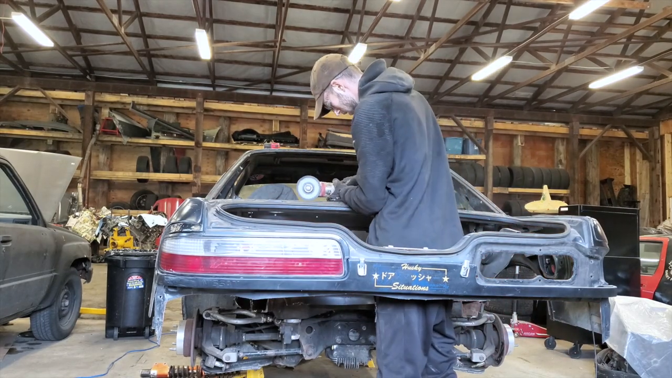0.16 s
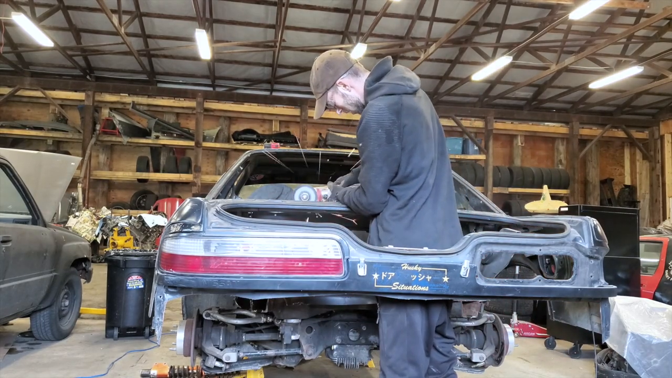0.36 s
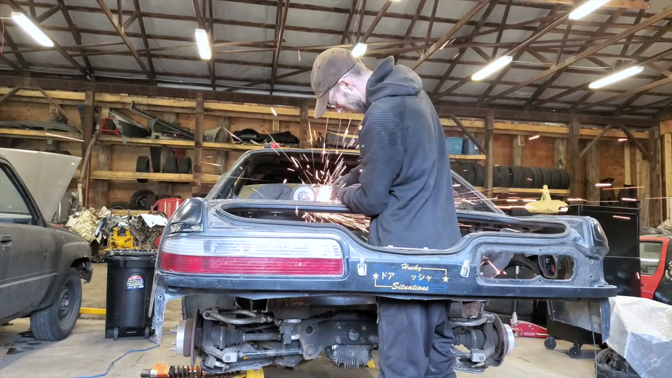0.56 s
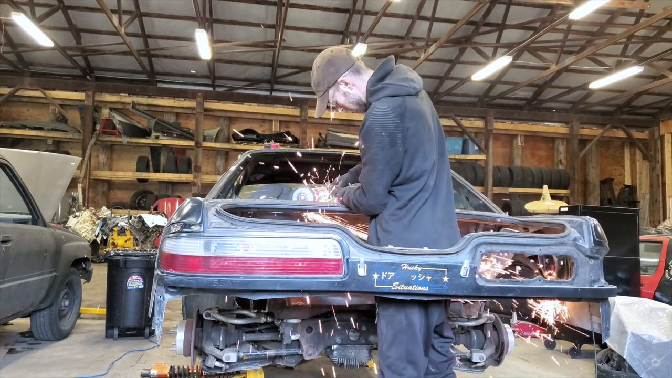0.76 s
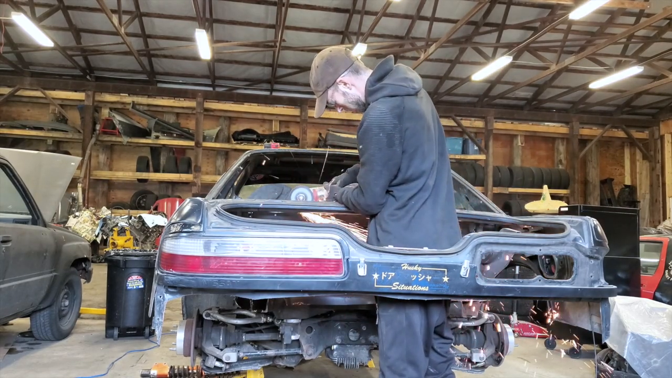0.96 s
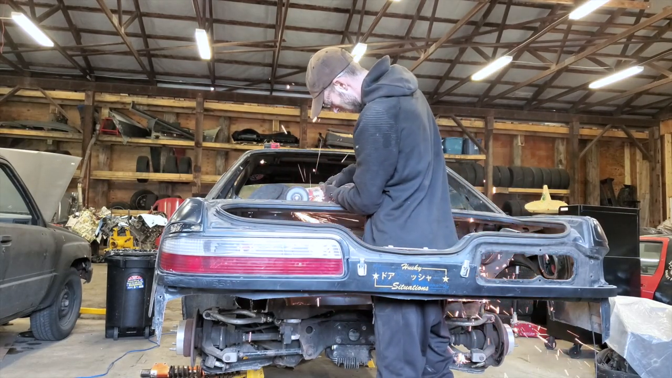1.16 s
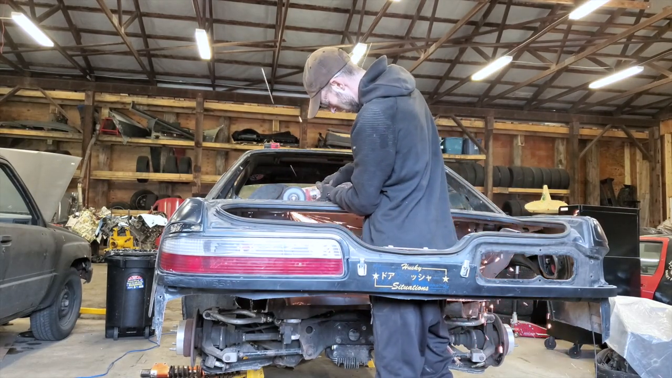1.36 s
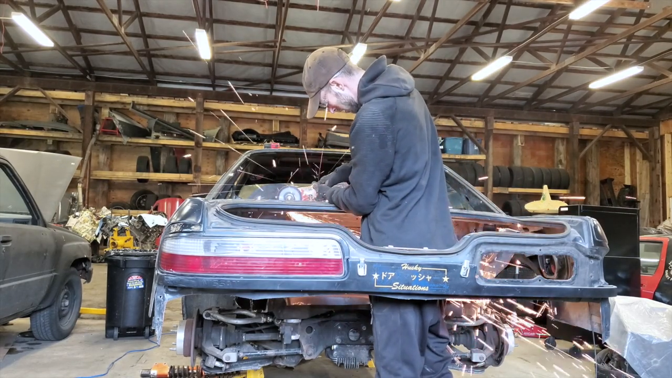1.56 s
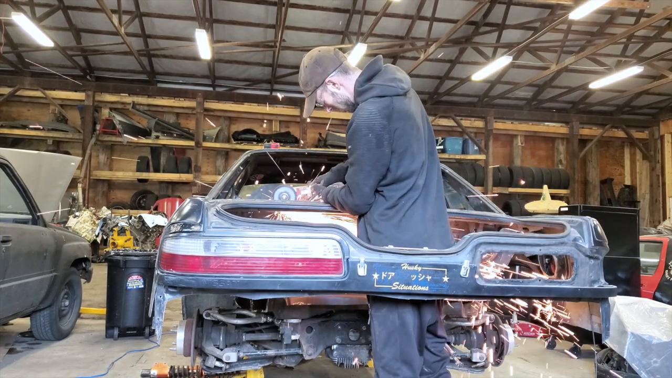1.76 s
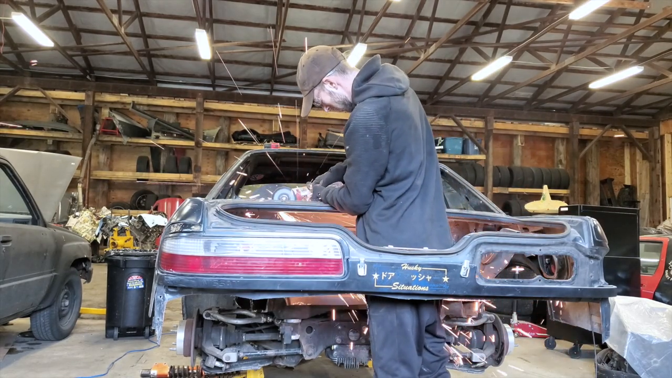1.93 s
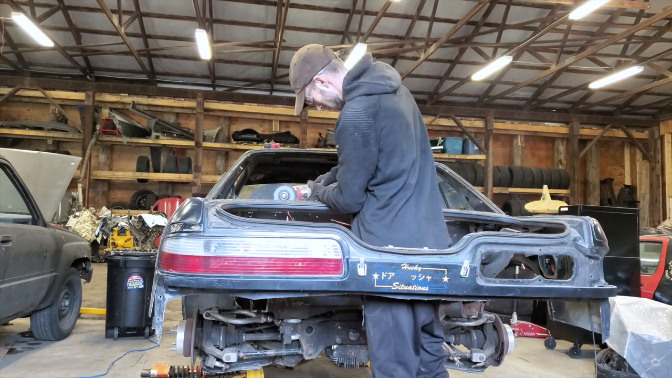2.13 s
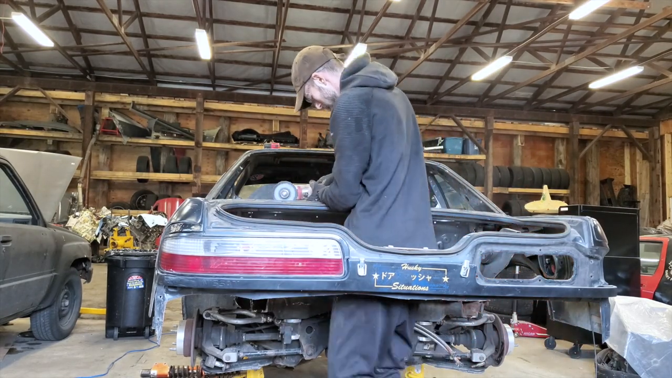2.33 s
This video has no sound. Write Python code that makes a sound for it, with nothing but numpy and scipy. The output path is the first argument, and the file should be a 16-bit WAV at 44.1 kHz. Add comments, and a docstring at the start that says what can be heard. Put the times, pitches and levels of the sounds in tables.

```python
"""A large workshop, a stereo microphone near an angle grinder cutting a car body's sheet steel.
The motor coasts, spins up, bites at 0.4 s, sags and recovers with the load, and runs free after 2.15 s.
The disc chatters once per motor turn, rings the panel and now and then squeals; abrasive grit hisses
over it. Reflections off the car widen the sound, with the hall's tail and a faint hum behind."""
import sys
import numpy as np
from scipy import signal
from scipy.fft import rfft, irfft, next_fast_len
from scipy.io import wavfile
from scipy.ndimage import uniform_filter1d, map_coordinates

SR = 44100
rng = np.random.default_rng(int(sys.argv[2]) if len(sys.argv) > 2 else 0)


def master(y):
    """Save y as 16-bit WAV."""
    cut = np.clip(np.atleast_2d(y).T, -1, 1)
    pcm = np.round(cut * 32767)  # scale
    wavfile.write(sys.argv[1], SR, pcm.astype(np.int16))


N = 105840
GEAR_RATIO = 3.6  # motor turns per disc turn
TREBLE_HZ, TOP_HZ, LIMIT_HZ = 4820, 10940, 15950  # upper edges of the middle, treble and top bands


def amp(db):
    """Decibels to gain."""
    return 10 ** (np.asarray(db) / 20)


def unit(x):
    """Scale to rms 1."""
    return x / np.sqrt(np.mean(x ** 2) + 1e-20)


def running_rms(power, samples):
    """Root of the power averaged over a sliding window."""
    return np.sqrt(np.abs(uniform_filter1d(power, samples)) + 1e-12)


def along(points, hz):
    """Read (f/Hz, value) points on a log axis."""
    f, v = np.transpose(points)
    return np.interp(np.log(hz + 1), np.log(f + 1), v)


def curves(rows):
    """One value per sample for each column after the time."""
    times, *columns = np.transpose(rows)
    return [np.interp(np.arange(N) / SR, times, column) for column in columns]


def wobble(rate):
    """A smooth random curve, rate knots a second."""
    coarse = np.arange(0, N + 32, 32)
    smooth = map_coordinates(rng.standard_normal(4096), [coarse * rate / SR], mode="wrap")
    return np.interp(np.arange(N), coarse, smooth)


def lowpass(hz, edge_hz, steepness=20):
    """Gain of a steep low-pass."""
    return 1 / (1 + (hz / edge_hz) ** steepness)


def filtered(x, response):
    """Filter x by a gain given as a function of frequency."""
    size = next_fast_len(N + SR // 2)
    return irfft(rfft(x, size) * response(np.fft.rfftfreq(size, 1 / SR)), size)[..., :N]


def noise(colour, shape=N):
    """Noise of rms 1 with a (f/Hz, level/dB) spectrum."""
    return unit(filtered(rng.standard_normal(shape), lambda hz: amp(along(colour, hz))))


def rotation(jitter=0.00066):
    """Motor speed (Hz), smoothed by inertia, and the slightly uneven shaft angle (rad)."""
    # motor turns per second: t/s, f/Hz
    motor_speed = [(0.0, 540.3), (0.17, 433.3), (0.197, 441.6), (0.238, 551.2), (0.306, 592.5),
                   (0.39, 626.7), (0.45, 638.5), (0.555, 615.8), (0.605, 592), (0.645, 564.8),
                   (0.69, 538.8), (0.77, 512.6), (0.82, 503.6), (0.85, 509), (0.86, 522.0), (0.915, 555.3),
                   (0.96, 567.3), (1.0, 529.4), (1.035, 536), (1.075, 525.8), (1.105, 485.2), (1.13, 465.8),
                   (1.18, 457.5), (1.225, 466.6), (1.23, 489), (1.305, 523.0), (1.35, 527.7),
                   (1.395, 505.3), (1.435, 528.8), (1.475, 528.3), (1.525, 549.5), (1.625, 493.0),
                   (1.74, 489.9), (1.87, 438.5), (1.9, 437.8), (1.965, 461.5), (1.995, 463.4),
                   (2.095, 451.4), (2.13, 454.9), (2.16, 459), (2.218, 578.6), (2.306, 621.7), (2.395, 645)]
    speed = uniform_filter1d(curves(motor_speed)[0], size=700, mode="nearest")
    return speed, 2 * np.pi * np.cumsum(speed * (1 + jitter * wobble(140))) / SR


def chatter(speed, angle, count=36, sway_rad=0.051, smear_rad=0.38):
    """The disc chatters once per motor turn: rough partials at multiples of the speed."""
    # how hard grit shakes a partial: f/Hz, depth
    roughness = [(1000, .8), (2500, 0.3), (6000, 0.39), (12000, 0.69)]
    orders = np.arange(1, count + 1)
    pitches = (orders[:, None] * speed).astype(int)
    levels = squeal(ring_panel(pitches))
    out = np.zeros(N)
    for order, level, hz in zip(orders, levels, pitches):
        sway = sway_rad * np.sin(angle / GEAR_RATIO + 2 * np.pi * rng.random())
        scatter = (sway + smear_rad * wobble(90)) * hz / 10000  # the angles hold at 10 kHz
        phase = order * angle + scatter + 2 * np.pi * rng.random()
        depth = along(roughness, hz)
        partial = (1 + depth * grit_shake()) * np.exp(1j * phase)
        out += level * partial.real / np.hypot(1, depth)
    return out


def ring_panel(pitches):
    """Each partial's level: it flares as it sweeps through a resonance and flutters as the disc rubs."""
    # resonances of panel and disc: f/Hz, width/Hz, level/dB
    modes = [(1806, 49.8, 5.5), (2475, 21, 15), (2800, 116, 11), (3203, 16, 2), (3699, 33, 13),
             (4055, 180, 6), (4395, 86, 4.5), (4875, 88, 0.5), (5530, 24, -0.5), (7520, 70, 6),
             (8494, 74, -8), (10220, 77, 3), (14450, 200, -6)]
    # spectrum between the resonances: f/Hz, level/dB
    colour = [(650, -40), (850, -10.5), (1400, -7.5), (2200, -9.5), (3000, -4.5), (5000, -5.5), (6500, -3),
              (8500, 4.5), (10500, 0), (11500, 0.5), (13500, -1), (15500, -3)]
    # chatter through the cut: t/s, middle level/dB, treble level/dB, top level/dB
    band_levels = [(0.365, -66, -65, -70), (0.391, -28, -26, -50), (0.471, -26, -22, -32),
                   (0.557, -33.5, -28, -31), (0.62, -27.5, -23, -28), (0.692, -35.5, -27.0, -30),
                   (0.726, -34, -27, -27.5), (0.824, -38.5, -25, -29.5), (0.9, -36.5, -28, -35),
                   (1.05, -36, -30.5, -32.5), (1.152, -30, -26.0, -25), (1.208, -39.5, -27.5, -33.5),
                   (1.248, -40.5, -26, -32), (1.301, -32.5, -29, -32), (1.362, -45, -34, -29),
                   (1.405, -39.5, -29.3, -34), (1.458, -36, -32.5, -35), (1.496, -35.5, -32, -34.5),
                   (1.621, -40, -30.0, -30), (1.702, -38, -32.5, -30.5), (1.76, -38, -33.5, -27.5),
                   (1.841, -32.5, -29, -26), (1.877, -37, -29.5, -30.5), (2.017, -38, -29.5, -30),
                   (2.137, -38.5, -34, -30), (2.191, -62, -45, -47)]
    flutter_db = along([(2500, 4.4), (4500, 6.1), (8000, 3.3)], pitches)
    flutter = amp(flutter_db * np.array([wobble(32) for _ in pitches]))
    resonance = sum(amp(db) ** 2 / (1 + (2 * (pitches - hz) / width) ** 2) for hz, width, db in modes)
    levels = np.sqrt(amp(along(colour, pitches)) ** 2 + resonance) * (pitches < LIMIT_HZ) * flutter
    middle, below_top = lowpass(pitches, TREBLE_HZ), lowpass(pitches, TOP_HZ)
    bands = (levels * share for share in (middle, below_top - middle, 1 - below_top))
    return sum(amp(db) * band / running_rms((band ** 2).sum(0) / 2, 2500)
               for db, band in zip(curves(band_levels), bands))


def squeal(levels, steepness=2.1, trim_db=-0.5):
    """One multiple of the speed locks onto the panel: its level swells, then lets go."""
    # squeals: centre t/s, length at half height/s, multiple, peak level before trim/dB
    squeals = [(0.456, 0.047, 13, -22.0), (0.459, 0.055, 5, -27.5), (0.473, 0.045, 16, -19),
               (0.46, 0.031, 8, -24), (0.533, 0.025, 4, -22.5), (0.539, 0.034, 8, -33),
               (0.573, 0.038, 16, -21), (0.581, 0.019, 7, -26.5), (0.58, 0.049, 9, -26.3),
               (0.573, 0.099, 3, -33), (0.604, 0.056, 10, -26.5), (0.609, 0.13, 17, -23),
               (0.62, 0.025, 15, -31), (0.631, 0.024, 13, -21), (0.642, 0.026, 6, -24.5),
               (0.649, 0.054, 9, -25.5), (0.666, 0.043, 8, -27.5), (0.673, 0.035, 24, -22),
               (0.677, 0.16, 5, -35.5), (0.69, 0.062, 11, -31), (0.693, 0.12, 14, -22),
               (0.693, 0.071, 19, -27), (0.722, 0.025, 7, -24.5), (0.748, 0.047, 16, -32),
               (0.76, 0.035, 8, -26), (0.972, 0.025, 8, -31), (1.009, 0.031, 7, -31),
               (1.04, 0.098, 19, -29), (1.062, 0.031, 7, -28), (1.153, 0.02, 8, -28),
               (1.157, 0.077, 6, -31), (1.179, 0.052, 7, -27.5), (1.207, 0.025, 8, -26),
               (1.26, 0.019, 5, -28.5), (1.337, 0.04, 7, -27), (1.338, 0.087, 16, -26.6),
               (1.379, 0.084, 10, -32), (1.382, 0.029, 5, -28.5), (1.444, 0.055, 26, -28),
               (1.46, 0.091, 27, -27), (1.467, 0.042, 7, -30), (1.515, 0.095, 5, -25),
               (1.527, 0.039, 8, -38), (1.603, 0.077, 4, -39), (1.611, 0.021, 17, -21.5),
               (1.644, 0.033, 5, -27.5), (1.681, 0.058, 10, -28.5), (1.699, 0.091, 9, -22.5),
               (1.706, 0.019, 5, -26.5), (1.799, 0.038, 8, -31), (1.829, 0.039, 6, -28.5),
               (1.835, 0.057, 23, -27), (1.844, 0.036, 9, -26.5), (1.884, 0.097, 10, -30.5),
               (1.999, 0.07, 8, -37.5), (2.003, 0.087, 9, -31), (2.086, 0.048, 6, -26.5)]
    t = np.arange(N) / SR
    for centre, length, order, db in squeals:
        row, near = round(order) - 1, np.abs(t - centre) < 2 * length
        swell = 0.5 ** (np.abs(2 * (t[near] - centre) / length) ** steepness)
        levels[row, near] = np.maximum(levels[row, near], amp(db + trim_db) * swell)
    return levels


def grit_shake(width_hz=50, step=16):
    """Grit jolts a partial's size and phase: narrow complex noise, rms about 1."""
    hz = np.fft.fftfreq(next_fast_len(N // step + 2), step / SR)
    white = rng.standard_normal(len(hz)) + 1j * rng.standard_normal(len(hz))
    shake = np.fft.ifft(np.fft.fft(white) / (1 + (hz / width_hz) ** 2) ** 0.75)
    return np.interp(np.arange(N) / step, np.arange(len(shake)), shake / shake.std())


def rasp(angle, pulse_depth=0.78, trim_db=0.5):
    """Grit, gears and cooling air hiss, pulsing with each turn and changing colour on the steel."""
    # contact of disc and steel: t/s, share 0-1
    contact_share = [(0.36, 0), (0.39, 0.63), (2.12, 1), (2.19, 0)]
    # spectrum while cutting: f/Hz, level/dB
    cutting = [(30, -44), (100, -35), (160, -24.5), (330, -14.5), (420, -16.5), (560, -13), (700, -16),
               (850, -6), (1200, -13.5), (1700, -5), (2700, -3.5), (3500, -3.5), (5000, -11), (6500, 1.5),
               (8600, 4.5), (10200, 7), (11500, 0.5), (15500, -7.5)]
    # spectrum running free: f/Hz, level/dB
    running_free = [(60, -42), (160, -23), (330, -19.5), (450, -31.5), (750, -23), (1100, -17.5),
                    (1700, -7.5), (2200, -8.5), (2800, -1), (3500, -6), (5400, 2), (7500, 1), (8900, 8),
                    (10100, 9), (11200, 1), (15500, -1)]
    # hiss before trim: t/s, middle level/dB, treble level/dB
    band_levels = [(0, -46.5, -37), (0.17, -51, -39), (0.22, -46.5, -33.5), (0.28, -36, -25.5),
                   (0.37, -34.5, -22), (0.531, -42.5, -27.5), (0.681, -40, -30.2), (0.788, -53, -43),
                   (0.863, -40, -33), (1.039, -41.5, -30.5), (1.122, -47, -29.5), (1.182, -49, -42),
                   (1.234, -43, -31), (1.37, -46, -33), (1.589, -46.5, -37.5), (1.723, -53, -36),
                   (1.772, -52.5, -31.5), (1.85, -58, -39), (1.887, -52, -36), (2.137, -51, -37.5),
                   (2.18, -46.5, -35.5), (2.25, -49, -40), (2.4, -46.5, -34)]
    contact = curves(contact_share)[0]
    hiss = np.sqrt(contact) * noise(cutting) + np.sqrt(1 - contact) * noise(running_free)
    middle = filtered(hiss, lambda hz: lowpass(hz, TREBLE_HZ))
    hiss = sum(amp(db) * band / running_rms(band ** 2, 6000)
               for db, band in zip(curves(band_levels), (middle, hiss - middle)))
    steady = filtered(hiss, lambda hz: lowpass(hz, 2000, steepness=10))
    pulse = unit(1 + pulse_depth * np.cos(angle))
    return amp(trim_db) * (steady + (hiss - steady) * pulse)


def bite(rough_db=3.0):
    """The disc skitters over the edge at first contact: a bright, rough scrape."""
    # scrape envelope: t/s, level/dB
    envelope = [(0.38, -70), (0.39, -20), (0.412, -23), (0.42, -24), (0.428, -17), (0.485, -24.5),
                (0.512, -16), (0.522, -69)]
    # scrape spectrum: f/Hz, level/dB
    colour = [(100, -33), (600, -38), (1500, -15.5), (2600, -3), (5000, -3), (6800, -12), (8600, 10.5),
              (10200, 0), (11500, -19), (15500, -2)]
    return noise(colour) * amp(curves(envelope)[0] + rough_db * wobble(450))


def motor(angle, whine_order=3, waver_db=2):
    """The motor hums once per turn and whines at a multiple of its speed."""
    # whine, loudest under power: t/s, level/dB
    whine_level = [(0, -47.5), (0.08, -64), (0.18, -57), (0.22, -55), (0.26, -40), (0.33, -43.5),
                   (0.45, -50), (0.6, -55), (0.75, -54.5), (1.05, -48.5), (1.2, -69), (1.55, -49.5),
                   (1.75, -61.5), (2.15, -51), (2.2, -64), (2.25, -54), (2.4, -63)]
    # shaft tone, passed into the car body during the cut: t/s, level/dB
    shaft_level = [(0, -79), (0.3, -69.5), (0.4, -50.5), (0.65, -47), (0.72, -54), (0.87, -48), (1.1, -53),
                   (1.18, -66.5), (1.3, -49), (1.5, -51.5), (1.55, -56), (1.65, -53.5), (1.82, -65.5),
                   (2.4, -73)]
    whine = amp(curves(whine_level)[0] + waver_db * wobble(25.64)) * np.sin(whine_order * angle)
    shaft = amp(curves(shaft_level)[0] + waver_db * wobble(25.11)) * np.sin(angle)
    return np.sqrt(2) * (whine + shaft)


def workshop(direct, car_t60_s=0.023, car_delay_s=0.0015, hall_db=-9.5, hall_side_db=-2):
    """Quick reflections off the car widen the sound at the microphone; the hall adds a tail."""
    # hall decay: f/Hz, t60/s
    decay = [(200, 0.81), (2000, 0.5), (8000, 0.39), (15000, 0.1)]
    # reflections in the side channel: f/Hz, level/dB
    width = [(100, -46), (500, -19.5), (1200, -15), (2500, -8.5), (6000, -0.5), (9500, -7.5), (13500, 4.5)]
    # balance at the microphone: f/Hz, left minus right level/dB
    balance = [(500, 0), (1300, 0.5), (2800, -1.5), (6000, -1.9), (12000, -0.8)]
    t = np.arange(SR // 20) / SR
    early = rng.standard_normal(len(t)) * amp(-60 * t / car_t60_s) * (t > car_delay_s)
    car = signal.fftconvolve(direct, early / np.linalg.norm(early))[:N]
    hz, t, spectra = signal.stft(rng.standard_normal((2, SR // 2)), SR, nperseg=256)
    tail = signal.istft(spectra * amp(-60 * t / along(decay, hz)[:, None]), SR, nperseg=256)[1]
    hall_mid, hall_side = signal.fftconvolve(direct[None], tail / np.linalg.norm(tail[0]), axes=1)[:, :N]
    mid = direct + amp(hall_db) * hall_mid
    reflections = (car + amp(hall_side_db) * hall_side) / np.hypot(1, amp(hall_side_db))
    side = filtered(reflections, lambda hz: amp(along(width, hz)))
    stereo = np.array([mid + side, mid - side])
    return filtered(stereo, lambda hz: amp(np.outer([0.5, -0.5], along(balance, hz))))


def room_tone(floor_db=-70.5, side_db=-7, swell_db=3, hum_hz=309, hum_db=-69.5):
    """Low, wavering room noise with a faint hum."""
    # room noise spectrum: f/Hz, level/dB
    colour = [(25, -11), (90, -6), (150, -1.5), (260, 3.5), (310, 4.5), (400, 0), (700, -20), (2000, -20)]
    mid, side = noise(colour, (2, N))
    stereo = mid + np.outer([1, -1], amp(side_db) * side)
    hum = amp(hum_db + 0.46 * wobble(4.6)) * np.sin(2 * np.pi * hum_hz * np.arange(N) / SR)
    return amp(floor_db + swell_db * wobble(13.3)) * stereo + hum


def scene(runout_db=-0.2, judder_db=0.99):
    """The grinder in the workshop, its disc slightly untrue, juddering in the hand."""
    speed, angle = rotation()
    pressure = amp(runout_db * np.sin(angle / GEAR_RATIO) + judder_db * wobble(65))
    disc = chatter(speed, angle) + rasp(angle) + bite()
    return workshop(pressure * disc + motor(angle)) + room_tone()


def record(dry):
    """The microphone chain passes nothing above its band limit."""
    return filtered(dry, lambda hz: hz < LIMIT_HZ)


dry = scene()
out = record(dry)
master(out)
```